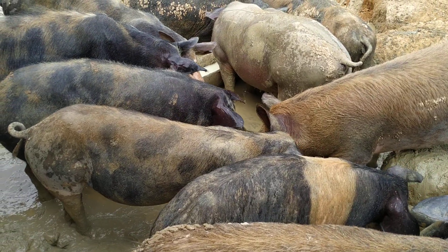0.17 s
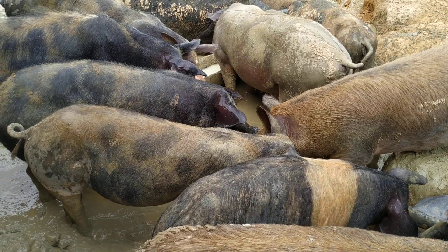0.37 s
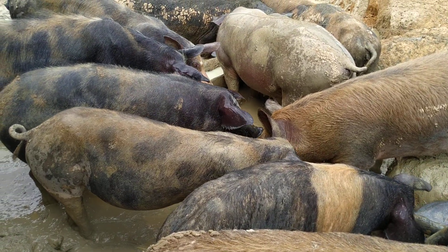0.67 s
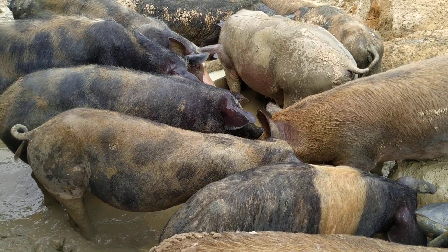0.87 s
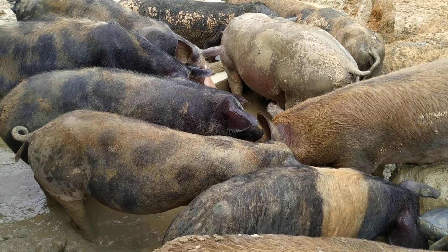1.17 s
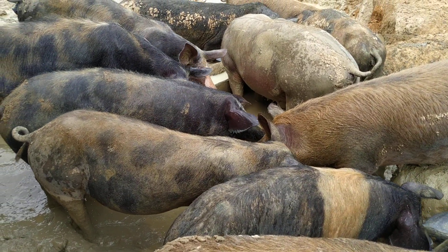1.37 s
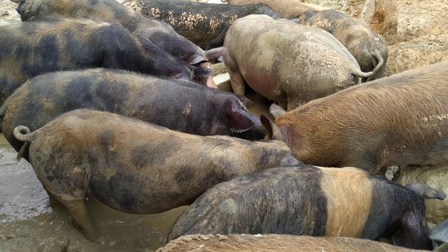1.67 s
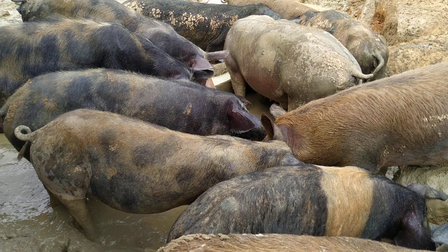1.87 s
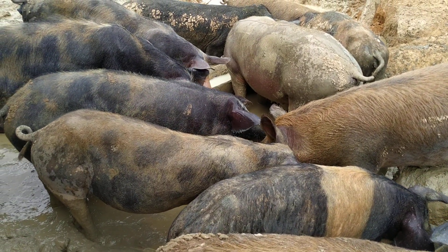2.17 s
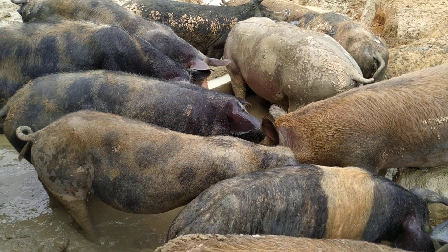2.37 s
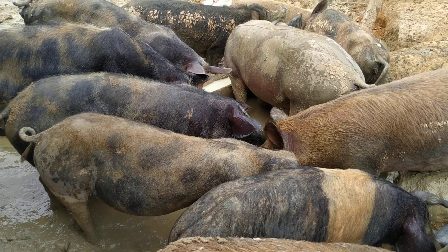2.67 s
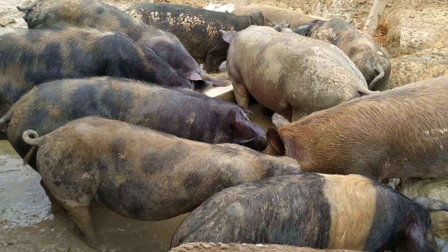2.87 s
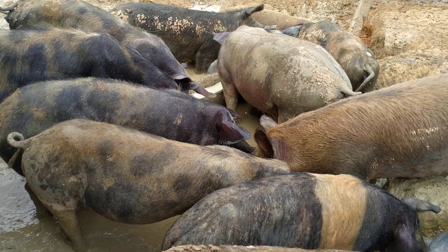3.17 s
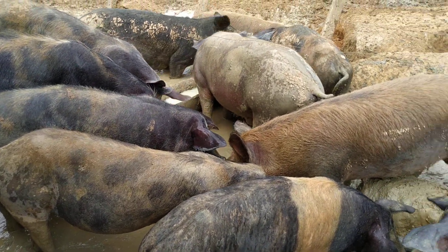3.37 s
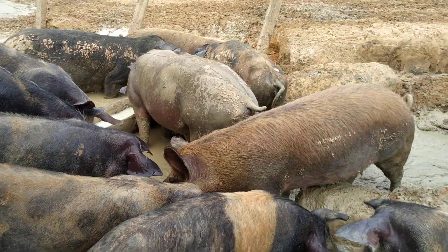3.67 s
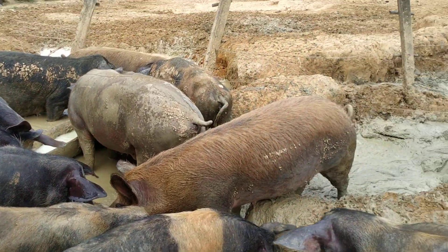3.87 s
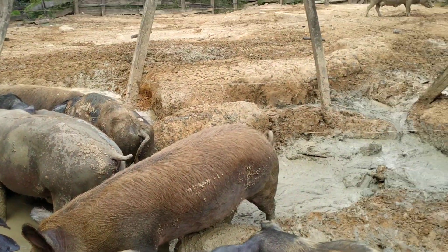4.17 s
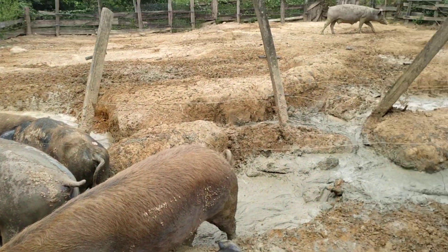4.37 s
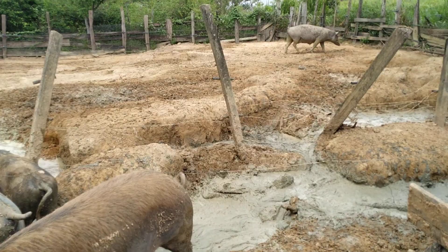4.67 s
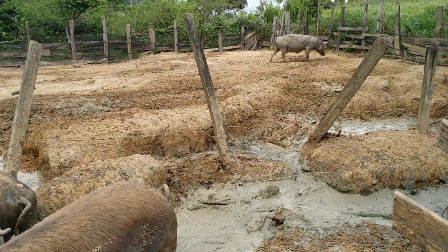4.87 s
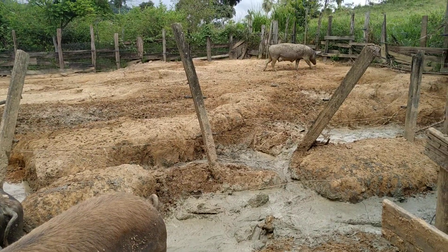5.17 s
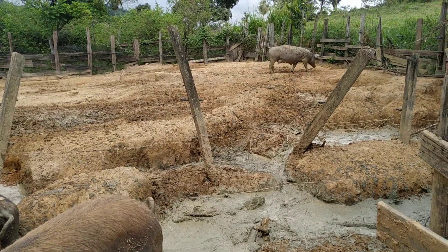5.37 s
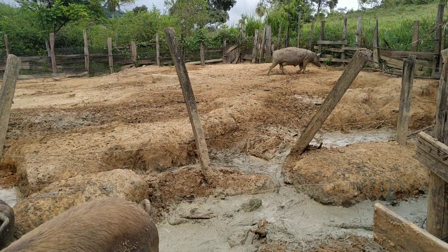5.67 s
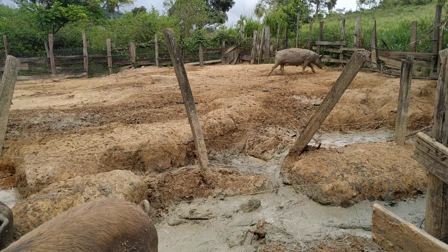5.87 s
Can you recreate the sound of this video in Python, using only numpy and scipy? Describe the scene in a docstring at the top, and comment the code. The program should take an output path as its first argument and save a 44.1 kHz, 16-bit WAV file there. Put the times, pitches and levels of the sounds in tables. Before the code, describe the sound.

A group of pigs feeds close to a stereo microphone in an open muddy pen. Bubbling slops, sticky smacks, squeaky sucks and soft fluttering snorts continue throughout. Near the middle one pig gives a low grunt in six slow pulses with a brief echo off boards. Faint pulses and a soft bump follow later. Insects hold a thin high shimmer and a small bird chirps occasionally.

```python
"""From the start insects drone on one high note behind an open pen: a narrow band of shimmering noise.
Pigs slurp and smack wet feed (bubble pops, noise bursts through resonances) and snort (chopped noise).
A small bird chirps from 0.4 s on, in arched whistles.
At 2.7 s one pig grunts in six slow pulses of ringing modes, which trough and fence throw back.
Three faint pulses follow near 4.5 s, then a soft low bump."""
import sys
import numpy as np
from scipy import signal
from scipy.fft import rfft, irfft, next_fast_len
from scipy.io import wavfile
from scipy.ndimage import map_coordinates

SR = 44100
rng = np.random.default_rng(int(sys.argv[2]) if len(sys.argv) > 2 else 0)


def dump(signal):
    """Clip the signal to [-1, 1] and save it as 16-bit WAV at the path in sys.argv[1]."""
    limited = np.clip(np.atleast_2d(signal).T, -1, 1)
    pcm = np.round(limited * 32767).astype(np.int16)
    wavfile.write(sys.argv[1], SR, pcm)


N = 266099

# All levels are relative; the functions add trims.
# Open air. Each row: frequency in Hz, level in dB per Hz.
AIR_SPECTRUM = [(12, -30), (20, 23), (61, 0), (158, -10), (1020, -11.5), (1280, -9), (2240, 0), (3500, -18),
                (5780, -5), (7030, 6), (8090, -30.5), (10400, -39.5), (15800, -35)]
# Insect chorus. Each row: frequency in Hz, level in dB per Hz.
INSECT_SPECTRUM = [(5000, -38), (6200, -12.5), (6900, 2.5), (7250, 3), (7800, -8.5), (8800, -14.5),
                   (10300, -7.5), (12500, -23), (15800, -21.5)]
# How busily the herd slurps. Each row: time in seconds, level in dB.
FEEDING_LEVEL = [(0, -40), (.3, -44), (1.0, -46.5), (1.6, -46), (2.05, -49.5), (2.4, -46.5), (2.65, -39.5),
                 (3.1, -46), (3.58, -54), (3.9, -42), (4.25, -49.5), (4.55, -44), (5.3, -47.5),
                 (5.5, -48.5), (6.03, -46.5)]
# Low bubbles in the slop. Each row: frequency in Hz, level in dB per Hz.
SLOSH_SPECTRUM = [(88, -31), (150, 5), (306, 0), (436, 4), (575, -9.5), (854, -0.5), (1110, -1),
                  (1340, -14), (3500, -19.5), (4550, -48), (7700, -120)]
# Fine bubbles. Each row: frequency in Hz, level in dB per Hz.
FROTH_SPECTRUM = [(1200, -7.5), (2300, -0.5), (3200, -4.5), (4600, 0), (6000, -3), (8000, 2), (10300, 4),
                  (12500, -3.5), (15800, -14)]
# Long sucks of slop. Each row: start in seconds, length in seconds, froth in dB, squeak in dB, squeak in Hz.
SUCK_EVENTS = [(0.033, 0.15, -31, -45.5, 2680), (1.571, 0.079, -42, -51, 3460),
               (2.448, 0.21, -32, -61, 2160), (2.738, 0.15, -35.5, -56, 2240),
               (3.292, 0.086, -35, -49, 2400), (3.412, 0.11, -38, -47, 2400),
               (3.651, 0.11, -34, -41.5, 4800), (3.799, 0.15, -31.5, -49, 3070),
               (4.114, 0.084, -37, -46, 4960), (4.612, 0.075, -47, -43, 3540),
               (5.149, 0.057, -43.5, -44, 3040)]
# Wet lip smacks. Each row: start in seconds, mouth in dB, spray in dB, mouth resonance in Hz.
SMACK_EVENTS = [(0.045, -26.5, -42, 2600), (0.1, -25.5, -33, 821), (0.789, -24.5, -34, 850),
                (0.805, -31, -28.5, 890), (0.81, -19, -33, 2130), (0.882, -26.5, -50, 415),
                (0.909, -31, -42, 945), (1.054, -31.5, -75, 846), (1.173, -30, -52, 425),
                (1.304, -71, -36, 460), (2.055, -55, -31.5, 400), (2.206, -31.5, -55, 383),
                (2.279, -48, -39, 656), (2.313, -48, -40, 485), (2.64, -26, -40, 700),
                (2.721, -23.5, -45, 335), (3.32, -27, -34.5, 398), (3.55, -32, -49, 2260),
                (3.709, -34, -51, 2300), (3.88, -22.5, -56, 777), (3.904, -32, -41, 780),
                (4.082, -43, -35.5, 546), (4.201, -35, -46, 430), (4.301, -36, -43, 1930),
                (4.416, -37, -37, 301), (4.712, -39, -32.5, 2340), (4.836, -34, -48, 1190),
                (5.18, -34, -45, 770), (5.242, -28, -40, 1160), (5.279, -35, -45, 795),
                (5.72, -24, -28.5, 920), (5.765, -31, -28, 2380), (5.936, -35.5, -30.5, 820),
                (5.952, -36.5, -32, 1110)]
# Spray and sticky ticks. Each row: frequency in Hz, level in dB per Hz.
SPRAY_SPECTRUM = [(1500, -16.5), (5500, -15), (7200, 7), (8800, 5), (10400, 10.5), (12500, -3.5),
                  (15800, -22)]
# Tongue against wet palate. Each row: frequency in Hz, width in Hz, level in dB.
SQUELCH_MODES = [(3240, 370, 0), (5540, 860, 5)]
# Rough snorts. Each row: start in seconds, length in seconds, nose in dB, snout rasp in dB,
# snout pitch as a ratio.
SNORT_EVENTS = [(.15, 0.64, -46.5, -37, 1.01), (1.378, 0.61, -44, -46, 0.95),
                (2.329, .66, -42.5, -40, 0.96), (3.878, .3, -41.5, -44.5, 1.02)]
# Nose formants. Each row: frequency in Hz, width at half amplitude in Hz, level in dB.
NOSE_FORMANTS = [(86.5, 31, 8.5), (195, 44, -1.5), (326, 36, 3), (453, 80, 0), (574, 34, 7.5),
                 (826, 310, -11), (1035, 99, -6)]
# Snout formants. Each row: frequency in Hz, width at half amplitude in Hz, level in dB.
SNOUT_FORMANTS = [(1636, 140, -2), (1847, 73, 3.5), (2107, 210, 1), (2620, 560, -7.5), (3160, 230, -8.5)]
# Low shudder of the snorting body. Each row: frequency in Hz, width at half amplitude in Hz, level in dB.
FLANK_FORMANTS = [(57.7, 47, 0)]
# Bird chirps. Each row: start in seconds, length in seconds, top pitch in Hz, level in dB,
# rasp as a share of pitch.
CHIRP_EVENTS = [(.41, .07, 7400, -41, .008), (4.11, .08, 5200, -42.5, .05), (4.34, .08, 5100, -46, .04),
                (4.91, .06, 7650, -43, .01), (5.54, .1, 7900, -39, .006)]
# Grunt pulses. Each row: start in seconds, then chest, throat, mouth and air puff in dB.
GRUNT_PULSES = [(2.731, -26, -34.5, -47, -32.5), (2.809, -19, -34, -36, -30.5),
                (2.901, -10.5, -26, -42.5, -27.5), (2.994, -11, -15.5, -24.5, -28),
                (3.084, -13.5, -27, -37, -34), (3.188, -14, -18.5, -28.5, -28.5),
                (4.463, -34, -39, -49, -44), (4.493, -40.5, -43, -61, -62), (4.528, -46, -45.5, -61, -62)]
# Chest modes. Each row: frequency in Hz, level in dB, t60 in seconds.
CHEST_MODES = [(136.5, -3.5, 0.053), (178.2, 6.5, 0.076)]
# Throat modes. Each row: frequency in Hz at tension 1, level in dB, t60 in seconds.
THROAT_MODES = [(278, 3, 0.033), (294.3, 3.5, 0.07), (362, 0, 0.11), (393.3, -4, 0.085)]
# Mouth modes. Each row: frequency in Hz, level in dB, t60 in seconds.
MOUTH_MODES = [(589, -2, 0.036), (706, -5, 0.081), (789, -2.5, 0.048), (926, 5, 0.018), (1003, -16, 0.069)]
# Air puff of a grunt pulse. Each row: frequency in Hz, level in dB per Hz.
PUFF_SPECTRUM = [(200, 4.5), (700, 5), (1400, -4), (2200, 5.5), (3500, -5.5), (6000, -5), (10000, 2.5),
                 (13000, -4.5), (15800, -16)]
# Echoes of a grunt pulse. Each row: mean delay in seconds, share of its amplitude.
WALL_ECHOES = [(.0085, 0.24), (0.032, 0.15), (.054, 0.11)]
# Scatter in the pen. Each row: frequency in Hz, t60 in seconds.
PEN_T60 = [(150, 0.22), (350, 0.42), (900, 0.16), (10000, 0.15)]
# Likeness of the two ears. Each row: frequency in Hz, left-right correlation.
EAR_LIKENESS = [(100, .95), (450, 0.87), (700, 0.54), (1000, 0.05), (2000, -0.14), (5000, 0.074)]
# Microphone ports. Each row: frequency in Hz, left minus right in dB.
PORT_DIFFERENCE = [(1000, 0), (3000, -1), (6500, -1.5), (8000, -10), (9000, -2.5), (10300, 14.5),
                   (12000, 8), (15000, -0.5)]

TOP_HZ = 15950
SLOSH_GROWS = 1.36  # the slosh swings wider than the froth, dB per dB
SQUELCH_GROWS, FIRM_SMACK_DB = 1.19, -34  # squelch dB per smack dB, about a firm smack
SQUEAK_SHARPNESS = 8.2  # gap between the lips: pitch over width
NOSE_ATTACK_S, SNOUT_ATTACK_S, SNORT_RELEASE_S = 0.18, 0.19, 0.24
SNOUT_DELAY = 0.071  # share of the snort before the snout rasps
SNORT_SAG_DB_PER_S = 9.5  # the rasp weakens as the air runs out


def amp(db):
    """Decibels to gain."""
    return 10 ** (np.asarray(db) / 20)


def unit(x):
    """Scale to rms 1."""
    return x / np.sqrt(np.mean(x ** 2) + 1e-20)


def struck(x):
    """Scale a hit to rms 1 over its first 20 ms."""
    return x / np.sqrt(np.mean(x[..., :SR // 50] ** 2) + 1e-20)


def along(points, hz):
    """Interpolate (Hz, value) points on a log axis."""
    f, v = np.transpose(points)
    return np.interp(np.log(hz + 1), np.log(f + 1), v)


def curves(rows):
    """One value per sample for each column after the time."""
    s, *cols = np.transpose(rows)
    return [np.interp(np.arange(N) / SR, s, c) for c in cols]


def wobble(knots_per_s, size=N):
    """A smooth random curve through normal knots."""
    steps = np.arange(0, size * knots_per_s / SR + 1, 1 / 8)
    smooth = map_coordinates(rng.standard_normal(len(steps)), [steps])
    return np.interp(np.arange(size) * knots_per_s / SR, steps, smooth)


def noise(size=N):
    """Two unrelated streams of white noise."""
    return rng.standard_normal((2, size))


def filtered(x, response):
    """x times a response of frequency."""
    n = x.shape[-1]
    m = next_fast_len(n + 2048, True)
    return irfft(rfft(x, m) * response(np.fft.rfftfreq(m, 1 / SR)), m)[..., :n]


def stereo(pair, response):
    """Two unrelated signals through a response to left and right, alike in the bass; rms 1."""
    def mid_side(hz):
        likeness = np.clip(along(EAR_LIKENESS, hz), -1, 1)
        return response(hz) * np.sqrt([1 + likeness, 1 - likeness])
    mid, side = filtered(pair, mid_side)
    return unit(np.array([mid + side, mid - side]))


def coloured(pair, spectrum):
    """A stereo sound of rms 1: the pair shaped by a spectrum."""
    return stereo(pair, lambda hz: amp(along(spectrum, hz)))


def resonate(pair, modes):
    """A stereo sound of rms 1 through (Hz, width Hz, dB) resonances of alternating sign."""
    def response(f):
        total = 0
        for k, (hz, width, db) in enumerate(modes):
            damping = 1j * f * width
            total = total + (-1) ** k * amp(db) * damping / (hz * hz - f * f + damping)
        return total
    return stereo(pair, response)


def add(out, s, x):
    """Mix x into out at time s."""
    part = out[..., max(round(s * SR), 0):][..., :x.shape[-1]]
    part += x[..., :part.shape[-1]]


def field(air_db=-51, rumble_db=-52.5, sway_db=-2.0):
    """Open air as coloured noise, with a low unsteady rumble."""
    rumble = coloured(noise(), [(15, -13.5), (55, 1.0), (95, -3), (150, -14.0), (400, -17.5),
                                (1500, -25.0), (5000, -90)])
    level_db = rumble_db + sway_db * wobble(3)
    return amp(air_db) * coloured(noise(), AIR_SPECTRUM) + amp(level_db) * rumble


def insects(drone_db=-39.0, shimmer_db=1, rise_db_per_s=0.43):
    """A chorus of insects merges into a narrow, shimmering band that slowly grows."""
    level_db = drone_db + rise_db_per_s * (np.arange(N) - N / 2) / SR
    return amp(level_db + shimmer_db * wobble(60)) * coloured(noise(), INSECT_SPECTRUM)


def pops(per_s, spread_db, size=N):
    """Two streams of tiny bursting bubbles of uneven size."""
    where, sign, strength = rng.random((int(2 * per_s * size / SR), 3)).T
    sizes = np.sign(sign - .5) * amp(-spread_db * np.log(strength + 0.0041))
    return np.bincount((where * 2 * size).astype(int), sizes, 2 * size).reshape(2, size)


def munching(count=170, centre_hz=1400, octaves=1, sharpness=12, t60_s=0.08, spread_db=2.0):
    """Pigs further down the trough chew out of step, each mouthful at its own pitch; rms 1."""
    out, t = np.zeros((2, N)), np.arange(SR // 10) / SR
    envelope = (1 - np.exp(-t / 0.022)) * amp(-60 * t / t60_s)
    for k in range(count):
        hz = np.clip(centre_hz * 2 ** (octaves * rng.normal()), 350, 6000)
        squish = resonate(noise(len(t)) * envelope, [(hz, hz / sharpness, 0)])
        start_s = (k + rng.random()) * N / SR / count
        add(out, start_s, amp(spread_db * rng.normal()) * squish)
    return unit(out)


def slurping(slosh_db=-52, munch_db=-54, froth_db=2.5, tick_db=-1, suck_db=-1):
    """Snouts churn the slop: low bubbles, munching, fine froth, sticky ticks; sucks squeak in a lip gap."""
    froth_level_db, = curves(FEEDING_LEVEL)
    slosh_level_db = SLOSH_GROWS * (froth_level_db - froth_level_db.mean())
    slosh = coloured(pops(per_s=900, spread_db=1) * amp(4.7 * wobble(21.85)), SLOSH_SPECTRUM)
    froth = coloured(pops(per_s=9000, spread_db=3) * amp(2.2 * wobble(35)), FROTH_SPECTRUM)
    # ticks come in short clumps
    clumps = amp(9.3 * np.minimum(wobble(70), 2))
    ticks = coloured(pops(per_s=4000, spread_db=4.0) * clumps, SPRAY_SPECTRUM)
    out = amp(slosh_level_db) * (amp(slosh_db) * slosh + amp(munch_db) * munching())
    out += amp(froth_level_db) * (amp(froth_db) * froth + amp(tick_db) * ticks)
    for s, length_s, db, squeak_db, hz in SUCK_EVENTS:
        swell = np.sqrt(np.hanning(int(length_s * SR)))
        size = len(swell)
        bubbles = pops(per_s=4700, spread_db=0.5, size=size) * amp(1.96 * wobble(100.4, size))
        suck = amp(db + suck_db) * coloured(bubbles, FROTH_SPECTRUM)
        squeak = amp(squeak_db) * resonate(bubbles, [(hz, hz / SQUEAK_SHARPNESS, 0)])
        add(out, s, swell * (suck + squeak))
    return out


def smacks(spray_db=0, squelch_db=-42, mouth_db=-11.0, parting_s=0.012, opening_s=0.017,
           rise_s=0.00043, clump_db=3, width_hz=130, shape=0.18):
    """Wet lips part in clumped noise; the tongue squelches and the open mouth rings."""
    out, t = np.zeros((2, N)), np.arange(SR // 10) / SR

    def burst(length_s):
        # the film of slop keeps tearing for a moment, then stops quickly
        return (1 - np.exp(-t / rise_s)) / (1 + (t / length_s) ** 3)

    for s, mouth, spray, hz in SMACK_EVENTS:
        squelch = SQUELCH_GROWS * ((mouth + spray) / 2 - FIRM_SMACK_DB)
        crackle = noise(len(t)) * amp(clump_db * wobble(740, len(t)))
        wet = struck(coloured(crackle * burst(parting_s), SPRAY_SPECTRUM))
        # the jaw opens to a new shape each time
        palate = [(f * np.exp(shape * rng.normal()), w, db) for f, w, db in SQUELCH_MODES]
        tongue = struck(resonate(crackle * burst(opening_s), palate))
        mouth_modes = [(hz, width_hz, 0), (900, 250, -10), (2150, 300, -14)]
        cavity = struck(resonate(crackle * burst(opening_s), mouth_modes))
        add(out, s, amp(spray + spray_db) * wet)
        add(out, s, amp(squelch + squelch_db) * tongue)
        add(out, s, amp(mouth + mouth_db) * cavity)
    return out


def through_formants(pair, formants):
    """Noise through summed (Hz, width Hz, dB) formant peaks; rms 1."""
    def response(f):
        return sum(amp(db) / (1 + (2 * (f - hz) / width) ** 2) for hz, width, db in formants)
    return stereo(pair, response)


def snorts(flutter_hz=43, jitter=0.2, depth_db=4, uneven_db=2.5, nose_db=0, snout_db=0, flank_db=-4):
    """The soft palate flutters unevenly and chops the air rushing through nose and snout formants."""
    out = np.zeros((2, N))
    for s, length_s, nose_level_db, snout_level_db, pitch in SNORT_EVENTS:
        t = np.arange(int(length_s * SR)) / SR
        size = len(t)
        turns = np.cumsum(flutter_hz * (1 + jitter * wobble(28.46, size))) / SR
        flutter = amp(depth_db * np.cos(2 * np.pi * turns) + uneven_db * wobble(23.65, size))
        tuned = [(hz * pitch, width, db) for hz, width, db in SNOUT_FORMANTS]
        nose = through_formants(flutter * noise(size), NOSE_FORMANTS)
        snout = through_formants(flutter * noise(size), tuned)
        flank = through_formants(flutter * noise(size), FLANK_FORMANTS)

        def swell(delay_s, attack_s):
            ramps = np.minimum((t - delay_s) / attack_s, (length_s - t) / SNORT_RELEASE_S)
            return np.sqrt(np.clip(ramps, 0, 1))

        body = nose + amp(flank_db) * flank
        add(out, s, amp(nose_level_db + nose_db) * swell(0, NOSE_ATTACK_S) * body)
        rasp_db = snout_level_db + snout_db - SNORT_SAG_DB_PER_S * t
        add(out, s, amp(rasp_db) * swell(SNOUT_DELAY * length_s, SNOUT_ATTACK_S) * snout)
    return out


def bird(arch=.06, flutter_db=2):
    """Thin whistles, some of them raspy, that rise and fall in a short arch."""
    out = np.zeros(N)
    for s, length_s, top_hz, db, rasp in CHIRP_EVENTS:
        u = np.linspace(-1, 1, int(length_s * SR))
        hz = top_hz * (1 - arch * u ** 2 + rasp * wobble(900, len(u)))
        level = amp(db + flutter_db * wobble(165, len(u))) * np.sqrt(1 - u ** 2)
        add(out, s, level * np.sin(2 * np.pi * np.cumsum(hz) / SR))
    return out


def grunt(chest_db=-8.5, throat_db=-1, mouth_db=-3, puff_db=2, puff_t60_s=0.15, rise_s=0.0036,
          stretch_per_db=0.0119):
    """Each flap of the vocal folds rings chest, throat and mouth and lets out a puff of air."""
    out, t = np.zeros((2, N)), np.arange(SR // 4) / SR
    puff_envelope = (1 - np.exp(-t / 0.0019)) * amp(-60 * t / puff_t60_s)

    def ring(modes, pitch=1):
        total = 0
        for hz, db, t60_s in modes:
            level = amp(db + rng.normal(0, 1.5) - 60 * t / t60_s)
            total = total + level * np.sin(2 * np.pi * hz * (pitch + rng.normal(0, .012)) * t)
        return struck((1 - np.exp(-t / rise_s)) * total)

    for s, chest, throat, mouth, puff in GRUNT_PULSES:
        # a pulse that stays in the chest leaves the throat slack and lower in pitch
        tension = 1 + stretch_per_db * (throat - chest + 2)
        voice = amp(chest + chest_db) * ring(CHEST_MODES)
        voice += amp(throat + throat_db) * ring(THROAT_MODES, tension)
        voice += amp(mouth + mouth_db) * ring(MOUTH_MODES)
        air = struck(coloured(noise(len(t)), PUFF_SPECTRUM) * puff_envelope)
        add(out, s, voice + amp(puff + puff_db) * air)
        # ground and nearby boards repeat the voice, reaching each ear a little apart
        for delay_s, share in WALL_ECHOES:
            arrival_s = s + delay_s * (1 + 0.054 * rng.normal())
            for ear in out:
                add(ear, arrival_s + 0.00041 * rng.normal(), share * voice)
    return out


def bump(s=4.584, hz=66.0, db=-26, t60_s=0.082):
    """A soft, low bump: one decaying sine."""
    out, t = np.zeros(N), np.arange(SR // 4) / SR
    envelope = amp(db - 60 * t / t60_s) * 2 * (1 - np.exp(-t / 0.0027))
    add(out, s, envelope * np.sin(2 * np.pi * hz * t))
    return out


def pen(x):
    """A short scatter from bodies, mud and fence: convolution with decaying noise."""
    hz, t, z = signal.stft(noise(SR // 2), SR, nperseg=256)
    decay = amp(-60 * t / along(PEN_T60, hz)[:, None])
    tail = stereo(signal.istft(z * decay, SR, nperseg=256)[1], np.ones_like)
    delayed = np.pad(x, ((0, 0), (500, 0)))  # samples
    return signal.fftconvolve(delayed, tail / np.linalg.norm(tail[0]), axes=1)[:, :N]


def scene():
    """Pigs close by, the field behind them."""
    pigs = smacks() + snorts() + grunt()
    return field() + insects() + slurping() + pigs + amp(-13.0) * pen(pigs) + bird() + bump()


def record(dry):
    """The two microphone ports ring at different treble pitches; nothing is kept above TOP_HZ."""
    def ports(hz):
        half_db = along(PORT_DIFFERENCE, hz) / 2
        gains = amp(np.array([half_db, -half_db]))
        # mean power of the two ears stays 1
        return gains / np.sqrt(np.mean(gains ** 2, axis=0)) * (hz < TOP_HZ)
    return filtered(dry, ports)


dry = scene()
out = record(dry)
dump(out)
```